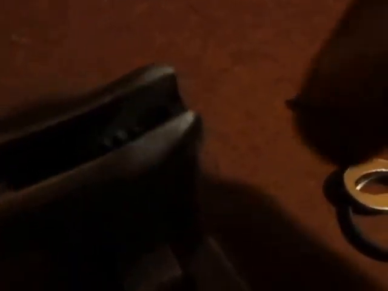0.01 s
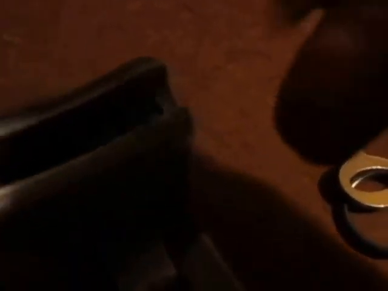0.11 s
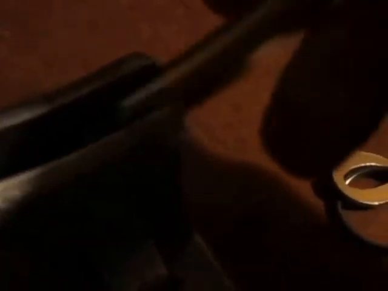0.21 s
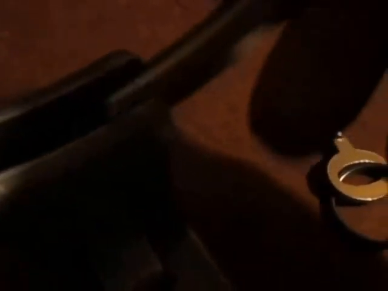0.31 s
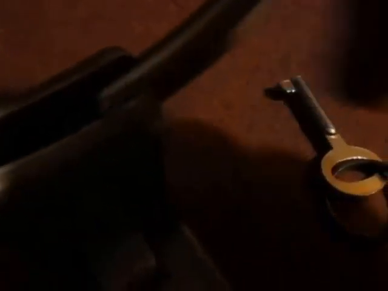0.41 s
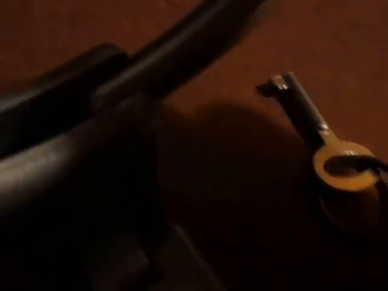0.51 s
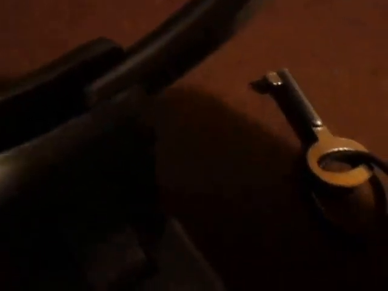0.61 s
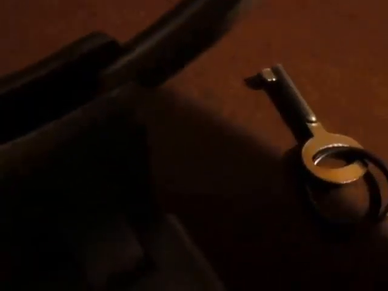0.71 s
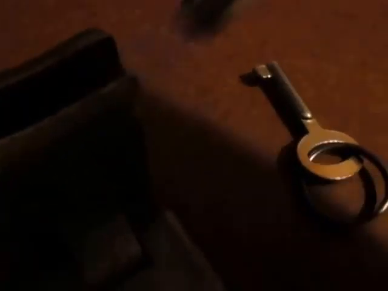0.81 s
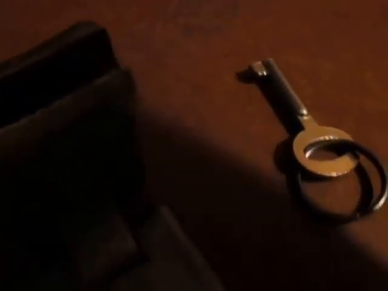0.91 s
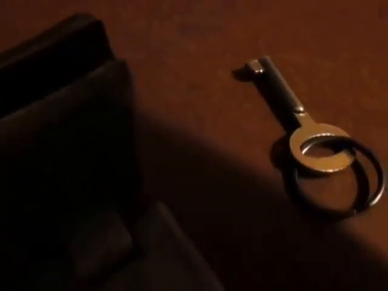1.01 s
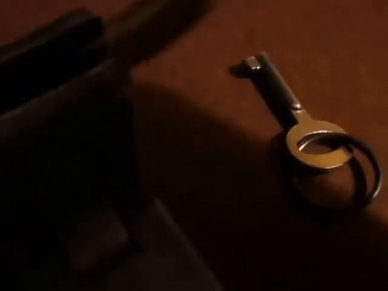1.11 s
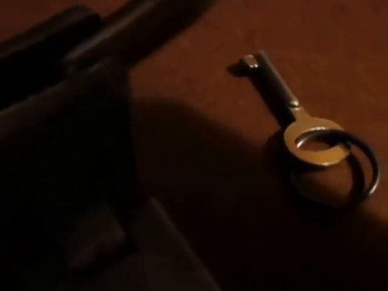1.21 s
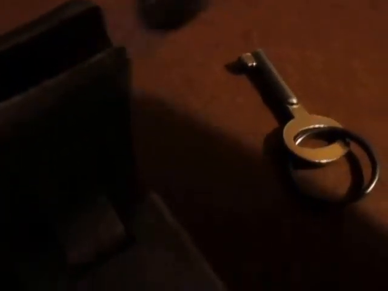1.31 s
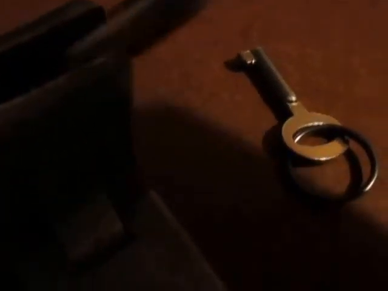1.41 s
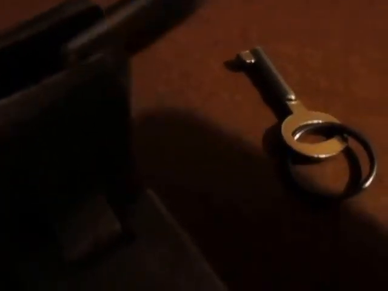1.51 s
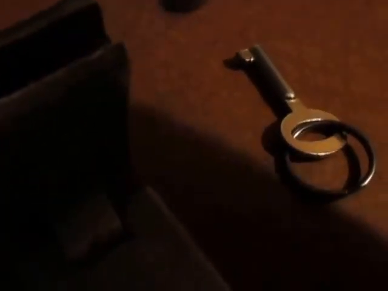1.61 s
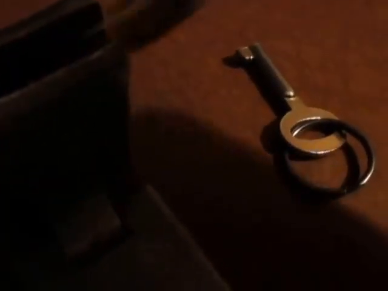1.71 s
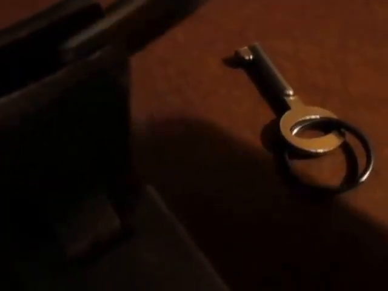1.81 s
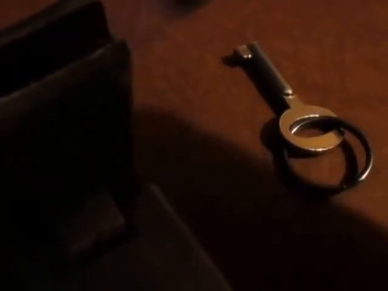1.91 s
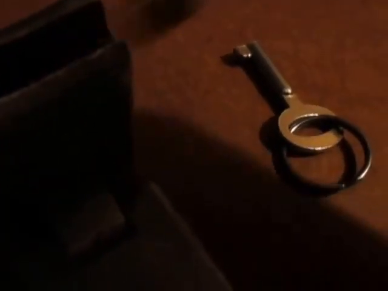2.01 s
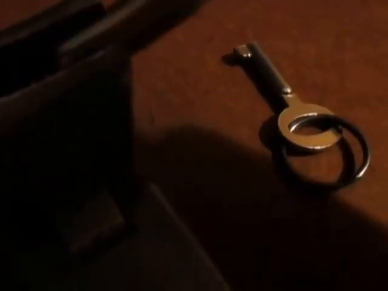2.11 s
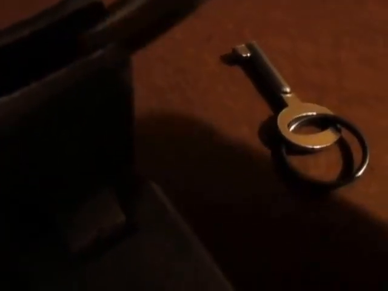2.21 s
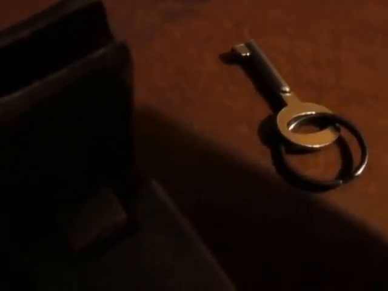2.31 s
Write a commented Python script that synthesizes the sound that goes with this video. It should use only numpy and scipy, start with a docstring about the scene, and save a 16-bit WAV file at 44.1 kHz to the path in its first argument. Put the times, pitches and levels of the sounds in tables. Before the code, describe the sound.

Metal handcuffs click closed tooth by tooth, close up, with light ticks and soft wooden knocks

```python
"""Steel handcuffs close, tooth by tooth, on a wooden table in a small room, close to the microphone.
From the start a low hum of sine lines wavers over dull noise, with steel ticks and soft wooden knocks.
From 0.2 s, five double clicks: the pawl catches, knocks and chatters, then snaps down and thumps the table.
Steel ticks are bursts of micro-impacts; knocks and ringing add damped modes.
From 0.8 s, friction noise gives short scrapes, and faint narrow bands of noise swell and fade."""
import sys
import numpy as np
from scipy import signal
from scipy.fft import rfft, irfft, next_fast_len
from scipy.io import wavfile
from scipy.ndimage import uniform_filter1d, map_coordinates

SR = 44100
rng = np.random.default_rng(int(sys.argv[2]) if len(sys.argv) > 2 else 0)


def output_pcm(signal):
    """Save a mono or channel-first signal as 16-bit PCM at the path in sys.argv[1].

    Samples are clipped to [-1, 1] before scaling.
    """
    pcm = np.clip(np.atleast_2d(signal).T, -1, 1) * 32767
    wavfile.write(sys.argv[1], SR, np.round(pcm).astype(np.int16))


N = 105840
T = np.arange(SR // 3) / SR  # time axis of one contact, s


def amp(db):
    """Decibels to gain."""
    return 10 ** (np.asarray(db) / 20)


def unit(x):
    """Scale to rms 1."""
    return x / np.sqrt(np.mean(x ** 2) + 1e-20)


def along(points, hz):
    """Read (frequency, value) points on a log frequency axis."""
    f, v = np.transpose(points)
    return np.interp(np.log(hz + 1), np.log(f + 1), v)


def filtered(x, response):
    """Multiply the spectrum of x by a response of frequency."""
    m = next_fast_len(len(x) + 4096)
    spectrum = rfft(x, m) * response(np.fft.rfftfreq(m, 1 / SR))
    return irfft(spectrum, m)[:len(x)]


def noise(colour, size):
    """Coloured noise of rms 1."""
    return unit(filtered(rng.standard_normal(size), lambda hz: amp(along(colour, hz))))


def add(track, s, sound):
    """Mix a sound in at time s."""
    i = max(0, round(s * SR))
    track[i:i + len(sound)] += sound[:N - i]


def fade(attack_s, t60):
    """A quick rise and an exponential decay that falls 60 dB in t60 seconds."""
    return (1 - np.exp(-T / attack_s)) * amp(-60 * T / t60)


def dull(x, edge_hz):
    """A softer contact loses the treble above its edge."""
    return signal.sosfilt(signal.butter(8, min(edge_hz, .45 * SR), fs=SR, output="sos"), x)


def wobble(t, rate):
    """A smooth random curve through `rate` random points per second."""
    return map_coordinates(rng.standard_normal(200), [t * rate], mode="wrap")


# Low hum in the room, one row per steady line: pitch_hz, level_db (rms)
HUM = [(51.5, -56.5), (102.5, -48.5), (154, -62), (205, -70.5), (301, -66.5)]
# Gain over time added to the second hum line only: time_s, gain_db
HUM_LEVEL = [(0, 11), (.17, 7.5), (.32, -4.5), (.6, -5.5), (.95, -2.5), (1.15, -3.5), (1.5, -7.5),
             (1.9, -6.5), (2.4, -16)]
HUM_WAVER_DB = 1


def hum():
    """Sine lines whose level and phase waver slowly; the second also follows its own level curve."""
    t = np.arange(N) / SR
    lines = []
    for hz, db in HUM:
        level = np.sqrt(2) * amp(db + HUM_WAVER_DB * wobble(t, 1.5))
        lines.append(level * np.sin(2 * np.pi * hz * t + 0.07 * wobble(t, 1.0)))
    lines[1] = lines[1] * amp(np.interp(t, *np.transpose(HUM_LEVEL)))
    return sum(lines)


# Background noise over time: time_s, level_db (rms)
AIR_LEVEL = [(0, -43.5), (.17, -43), (.36, -57), (.62, -48.5), (.95, -46.5), (1.28, -50.5), (1.5, -52.5),
             (1.95, -51), (2.4, -54.5)]
# Spectral shape of that noise: frequency_hz, relative_level_db (per Hz)
AIR = [(20, 0.5), (50, -1), (130, 8), (250, -9.5), (700, -18), (1100, -21), (2000, -22), (3000, -31.5),
       (3900, -30.5), (4800, -39.5), (6500, -61), (16000, -65.5)]


def air():
    """Dull room noise that swells and sinks."""
    t = np.arange(N) / SR
    return amp(np.interp(t, *np.transpose(AIR_LEVEL))) * noise(AIR, N)


GRAIN_DB, GRAIN_S = -0.5, 0.00031  # micro-impacts: spread of their sizes, spacing
PEAK_DB, PEAK_WIDTH_HZ = 12, 180  # lift at a resonance, distance at which half the dB remain


def grit(colour, envelope, resonances_hz=()):
    """Steel on steel: a burst of micro-impacts, coloured by the resonances of its contact point."""
    knots = np.clip(rng.standard_normal(2000), -1.5, 1.5)
    sizes = amp(GRAIN_DB * np.interp(T / GRAIN_S, np.arange(len(knots)), knots))

    def response(hz):
        lift_db = sum(PEAK_DB / (1 + ((hz - centre) / PEAK_WIDTH_HZ) ** 2) for centre in resonances_hz)
        return amp(along(colour, hz) + lift_db)

    burst = envelope * filtered(sizes * rng.standard_normal(len(T)), response)
    return burst * np.linalg.norm(envelope) / np.linalg.norm(burst)  # same energy as the envelope


RATTLE_PER_S, RATTLE_SPREAD_DB, RATTLE_CONTACT_T60 = 400, 4, .013  # mean contact rate, +/- dB, s


def rattling():
    """Envelope of rms 1 for a loose part that touches at uneven moments with uneven force."""
    touches = rng.random(len(T)) < RATTLE_PER_S / SR
    contacts = touches * amp(RATTLE_SPREAD_DB * rng.uniform(-1, 1, len(T)))
    return unit(signal.fftconvolve(contacts, fade(.0002, RATTLE_CONTACT_T60))[:len(T)])


# Loose steel parts tick, close to the microphone:
# start_s, gain_db, lower_edge_hz, treble_edge_hz, strongest_hz
TICKS = [(.014, -35, 2800, 6000, 5580), (0.206, -17, 2064, 8200, 4400), (0.2211, -11.5, 1000, 8200, 5900),
         (0.285, -51, 922, 5500, 4000), (0.431, -48, 1010, 5070, 4750), (.446, -45, 1470, 6800, 5900),
         (0.656, -33, 1500, 8950, 4910), (0.794, -40.5, 4000, 5110, 4800), (.990, -24.5, 5200, 7480, 5850),
         (1.0846, -19, 1500, 8800, 4570), (1.104, -16, 2000, 10100, 5950), (1.22, -47.5, 900, 6130, 4290),
         (1.4024, -45, 2000, 6200, 5900), (1.437, -31.5, 3000, 6420, 4400), (1.4591, -24, 1500, 6800, 6200),
         (1.4742, -30.5, 3470, 6500, 5200), (1.527, -48, 3540, 5070, 4520), (1.754, -32, 3500, 6760, 5960),
         (1.7738, -37, 1500, 10000, 5840), (1.782, -41, 1500, 6340, 3600), (1.8183, -25, 1400, 11300, 4660),
         (1.889, -43.5, 2000, 8260, 4070), (1.9186, -40, 1520, 6800, 5940),
         (2.0775, -21.5, 2000, 8800, 6400), (2.175, -25.5, 3530, 11300, 4570),
         (2.286, -52, 997, 6930, 4050)]
# Spectral shape of ticks and scrapes: frequency_hz, relative_level_db (per Hz)
TICK_COLOUR = [(200, -9.5), (1400, 5.5), (2800, -4.5), (4500, 2.5), (6000, 0), (8000, -12.5), (15000, -1)]
# Spectral shape of rattling steel: frequency_hz, relative_level_db (per Hz)
RATTLE_COLOUR = [(300, -9.5), (1100, 17), (1600, 2), (2600, -0.5), (4000, -5), (6000, 0.5), (7200, -22),
                 (10000, -24.5), (15000, -55)]
TICK_RATTLE_DB, TICK_RATTLE_T60 = -19, 0.045  # gain, s


def ticks():
    """Light, dry steel ticks, some as the hand shifts the cuff and some as the ratchet touches again just after
    a click; each part shivers on briefly."""
    out = np.zeros(N)
    for s, db, low_hz, edge_hz, peak_hz in TICKS:
        tick = amp(10) * grit(TICK_COLOUR, fade(0.0028, .016), [peak_hz])
        shiver = grit(RATTLE_COLOUR, rattling() * fade(0.0023, TICK_RATTLE_T60), [peak_hz])
        tick = tick + amp(TICK_RATTLE_DB) * shiver
        thin = signal.sosfilt(signal.butter(7, low_hz, "high", fs=SR, output="sos"), tick)
        add(out, s, amp(db) * dull(thin, edge_hz))
    return out


STEEL_DETUNE, BODY_DETUNE, BOW_DETUNE = .003, .02, .025  # random pitch spread, as a fraction


def ring(modes, scatter_db, attack_s, detune=STEEL_DETUNE):
    """Damped modes, struck and gripped a little differently each time."""
    chance = np.clip(rng.standard_normal((len(modes), 2)), -1.5, 1.5)
    total = np.zeros(len(T))
    for (hz, db, t60), (level_chance, pitch_chance) in zip(modes, chance):
        tone = np.sin(2 * np.pi * hz * (1 + detune * pitch_chance) * T)
        total += amp(db + scatter_db * level_chance) * fade(attack_s, t60) * tone
    return total


# Modes of the cuff lying on the wood, before detuning: pitch_hz, relative_level_db, t60_s
BODY = [(223, -4, 0.06), (286, -9.5, 0.19), (369.8, 0, .085), (393.5, -12, 0.17), (500, -11, 0.013),
        (608, 2, .06), (682, 0, 0.051), (824, -8, 0.049), (961, -9, 0.031), (1077, -4.5, 0.044)]
# Spectral shape of the dull tap: frequency_hz, relative_level_db (per Hz)
KNOCK_COLOUR = [(40, -1.5), (130, -7.5), (400, -1), (700, -9.5), (1100, -12.5), (1500, -16.5),
                (3000, -32.5), (8000, -61)]
TAP_FOCUS = .35  # share of a knock's focus that also colours its tap


def knock(centre_hz, focus_db):
    """The cuff bumps the wood: a dull tap and its hollow modes, favouring those near centre_hz."""
    def loss_db(hz):
        return focus_db * np.minimum(np.log2(hz / centre_hz) ** 2, 2)  # focus_db one octave away

    modes = [(hz, db - loss_db(hz), t60) for hz, db, t60 in BODY]
    tap = noise([(hz, db - TAP_FOCUS * loss_db(hz)) for hz, db in KNOCK_COLOUR], len(T))
    hollow = ring(modes, scatter_db=1, attack_s=0.00071, detune=BODY_DETUNE)
    return amp(-6) * hollow + amp(-7) * tap * fade(.002, 0.04)


# The cuff rocks against the table: start_s, gain_db, strongest_hz
KNOCKS = [(.014, -21.5, 790), (.099, -27.5, 780), (0.172, -34.5, 720), (.207, -17, 580),
          (.2225, -10.5, 620), (0.386, -27, 400), (0.4503, -27.5, 450), (0.456, -27, 430), (0.66, -24, 560),
          (.728, -39, 620), (.792, -22, 359), (.923, -38, 361), (0.9908, -17, 590), (1.029, -41, 520),
          (1.087, -29, 390), (1.102, -18, 330), (1.3224, -30, 660), (1.398, -27.5, 380),
          (1.455, -17.5, 580), (1.529, -36, 530), (1.631, -33.5, 700), (1.699, -43, 450), (1.754, -15, 970),
          (1.8193, -28, 720), (1.897, -32.5, 500), (2.015, -35.5, 580), (2.155, -37, 700),
          (2.178, -28, 650), (2.2916, -30, 480)]


def knocks():
    """Soft wooden knocks as the hand shifts the cuff."""
    out = np.zeros(N)
    for s, db, centre_hz in KNOCKS:
        add(out, s, amp(db) * knock(centre_hz, focus_db=7.5))
    return out


# Tonal balance of the room's reply: frequency_hz, gain_db
ROOM_COLOUR = [(60, -2), (300, 0.5), (1100, 11), (2500, -17.5), (6000, -30.5), (7500, -16.5), (15000, -35)]
# Decay of the room: frequency_hz, t60_s
ROOM_T60 = [(100, 0.75), (700, 0.17), (3000, 0.056), (7000, .15), (14000, 0.17)]
ROOM_DB, ROOM_DELAY_S = -28.5, 0.0029


def room(x):
    """A small, dry room: a decaying noise tail, longest in the bass and shortest near 3 kHz."""
    hz, t, z = signal.stft(rng.standard_normal(SR // 2), SR, nperseg=256)
    decay = amp(-60 * t / along(ROOM_T60, hz)[:, None])
    tail = signal.istft(z * decay, SR, nperseg=256)[1]
    tail = np.pad(tail / np.linalg.norm(tail), (round(ROOM_DELAY_S * SR), 0))
    return filtered(signal.fftconvolve(x, tail)[:N], lambda hz: amp(along(ROOM_COLOUR, hz)))


# The pawl catches a tooth, close to the microphone: start_s, click_gain_db, knock_gain_db,
# treble_edge_hz, ring_gain_db (under the click), lower_resonance_hz, upper_resonance_hz,
# chatter_gain_db (under the click)
CATCHES = [(0.2162, -5, -8.5, 10160, -4.5, 5850, 9400, -12),
           (1.1437, -10.5, -7.5, 15400, -7, 4550, 8100, 1),
           (1.4285, -12.5, -17, 12000, -15, 4300, 5700, -1),
           (1.747, -10.5, -10.5, 15600, -10, 3750, 6100, -22),
           (2.058, -9.5, -14, 9360, -10, 4400, 8200, -7.5)]
# Spectral shape of the catch: frequency_hz, relative_level_db (per Hz)
CATCH_COLOUR = [(100, -10), (600, 10), (1100, 4.5), (1700, -7.5), (2800, -6.5), (4200, 4), (6500, -6),
                (10000, -2), (16000, -8.5)]
# Modes of the steel, damped by the hand, before detuning: pitch_hz, relative_level_db, t60_s
STEEL = [(1793, -1, 0.023), (1950, -11, 0.012), (4100, -8, .035), (4350, -8, .035), (5000, -16, 0.037),
         (6050, -7.5, 0.022), (5900, 5, 0.035), (7100, -12.5, .035), (6760, -11, .025),
         (7500, -16.5, 0.027), (8820, -7.5, 0.035), (12200, -20, 0.012), (11200, -14.5, 0.019)]
CHATTER_S, CHATTER_LOSS_DB = .003, 8  # nominal time between bounces, loss per bounce
CHATTER_ATTACK_S, CHATTER_T60 = .0003, .005  # seconds


def catches():
    """First click of each tooth: a hard crack with ringing steel, a knock and three chattering bounces."""
    out = np.zeros(N)
    for s, click_db, knock_db, edge_hz, ring_db, *resonances_hz, chatter_db in CATCHES:
        crack_envelope = amp(9) * fade(0.0008, 0.0067) + amp(-2) * fade(0.003, 0.013)
        crack = grit(CATCH_COLOUR, crack_envelope, resonances_hz)
        ringing = amp(ring_db) * ring(STEEL, scatter_db=2, attack_s=.0003)
        add(out, s, amp(click_db) * dull(crack + ringing, edge_hz))
        for k, slip in enumerate(rng.uniform(-0.17, 0.15, size=3)):  # uneven bounce times
            chatter = amp(8.5) * grit(CATCH_COLOUR, fade(CHATTER_ATTACK_S, CHATTER_T60), resonances_hz)
            bounce_db = click_db + chatter_db - CHATTER_LOSS_DB * k
            add(out, s + CHATTER_S * (k + 1 + slip), amp(bounce_db) * dull(chatter, edge_hz=6100))
        add(out, s, amp(knock_db) * knock(centre_hz=694, focus_db=8.5))
    return out


# The pawl snaps down behind the tooth: start_s, click_gain_db, thump_gain_db, treble_edge_hz,
# lower_resonance_hz, upper_resonance_hz, rattle_gain_db (under the click)
SNAPS = [(0.2349, -9.5, -17, 10900, 2500, 6370, -15.5), (1.1635, -11.5, -18, 13200, 6650, 7380, -14),
         (1.4526, -11, -21.5, 12800, 3900, 7300, -23), (1.7634, -10.5, -17.5, 12980, 3720, 8820, -25),
         (2.0718, -9.5, -19.5, 13500, 4300, 7200, -32.5)]
# Spectral shape of the snap: frequency_hz, relative_level_db (per Hz)
SNAP_COLOUR = [(100, -2), (600, 4), (1400, -7), (2300, -8.5), (3800, -5), (7000, -5), (10000, -8.5),
               (13000, -5.5), (16000, -27)]
# The free bow sings on faintly, before detuning: pitch_hz, relative_level_db, t60_s
BOW = [(3180, -31, .1), (5150, -35, 0.075), (5960, -29, 0.15), (7780, -39.5, .08), (9520, -26.5, .09),
       (10370, -36.5, .08)]
# Modes of the table top, before detuning: pitch_hz, relative_level_db, t60_s
TABLE = [(58.47, -19.5, 0.046), (100, -5.5, .07), (129.4, 0.5, 0.16), (165, -2, 0.055), (216, -8, 0.082),
         (297.7, -14, .13)]
BOW_DB = 14  # gain of the singing over the rattle gain
RATTLE_T60, THUMP_DELAY_S = 0.13, .0025  # seconds


def snaps():
    """Second click: the spring snaps the pawl down, the loose bow rattles and sings, the table thumps."""
    out = np.zeros(N)
    for s, click_db, thump_db, edge_hz, *resonances_hz, rattle_db in SNAPS:
        # squaring the envelope softens its rise and halves its decay time
        crack = amp(18.5) * grit(SNAP_COLOUR, fade(0.0024, .026) ** 2, resonances_hz)
        rattle = amp(rattle_db) * grit(RATTLE_COLOUR, rattling() * fade(0.0038, RATTLE_T60))
        singing = amp(rattle_db + BOW_DB) * ring(BOW, scatter_db=1.5, attack_s=.001, detune=BOW_DETUNE)
        add(out, s, amp(click_db) * dull(crack + rattle + singing, edge_hz))
        table = ring(TABLE, scatter_db=0.5, attack_s=0.0016, detune=BODY_DETUNE)
        thump = table + amp(-5) * knock(centre_hz=644, focus_db=3)
        add(out, s + THUMP_DELAY_S, amp(thump_db) * thump)
    return out


def swell(middle_s, half_width_s, db):
    """A bell-shaped rise and fall in level."""
    t = np.arange(N) / SR
    return amp(db) * np.exp(-.5 * ((t - middle_s) / half_width_s) ** 2)


# The bow slides over the pawl: middle_s, half_width_s, peak_level_db
SCRAPES = [(.80, 0.037, -67.5), (1.09, 0.0054, -34.5), (1.214, 0.014, -48), (1.318, 0.0078, -52.5),
           (1.409, 0.015, -58.5), (1.995, 0.0092, -63.5)]


def scrapes():
    """Short strokes of steel friction: noise made grainy by fast random level changes."""
    grain = amp(4.5 * unit(uniform_filter1d(rng.standard_normal(N), size=50)))
    friction = unit(dull(grain * noise(TICK_COLOUR, N), edge_hz=5700))
    return friction * sum(swell(*row) for row in SCRAPES)


# Faint narrow bands of noise: three near 1.8 kHz, and a brief thin tone at 4.2 kHz near the end:
# middle_s, half_width_s, peak_level_db, pitch_hz
NARROW_BANDS = [(.86, 0.042, -55.5, 1806), (1.088, 0.0051, -42, 1750), (1.265, 0.025, -59.5, 1852),
                (2.265, 0.01, -62, 4210)]
BAND_WIDTH_HZ = 90  # distance from the pitch at which the amplitude halves


def narrow_bands():
    """Noise passed through a narrow resonance sounds almost pitched; each band swells and fades."""
    out = np.zeros(N)
    for *row, pitch_hz in NARROW_BANDS:
        response = lambda hz: 1 / (1 + ((hz - pitch_hz) / BAND_WIDTH_HZ) ** 2)
        out += swell(*row) * unit(filtered(rng.standard_normal(N), response))
    return out


def scene():
    """The cuffs near the microphone, the faint narrow bands, the room's reply, the hum and noise."""
    close = ticks() + knocks() + catches() + snaps() + scrapes() + narrow_bands()
    return (close + amp(ROOM_DB) * room(close) + hum() + air())[None]


TOP_HZ = 16800


def record(dry):
    """The recorder clips near full scale, then fades out the last 900 Hz below its band limit."""
    clipped = np.clip(dry[0], -.92, .92)
    return filtered(clipped, lambda hz: np.clip((TOP_HZ - hz) / 900, 0, 1))[None]


dry = scene()
out = record(dry)
output_pcm(out)
```